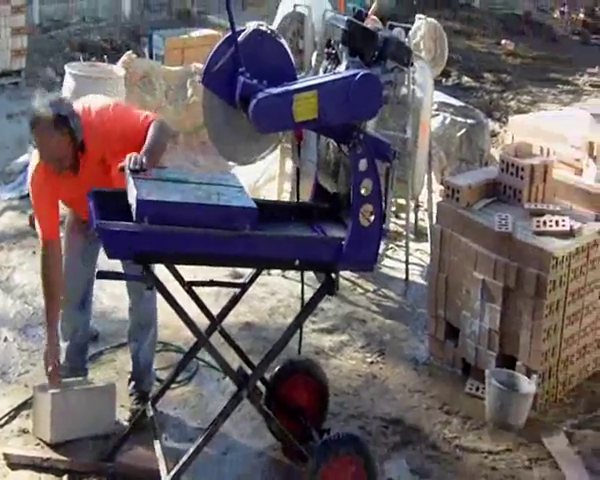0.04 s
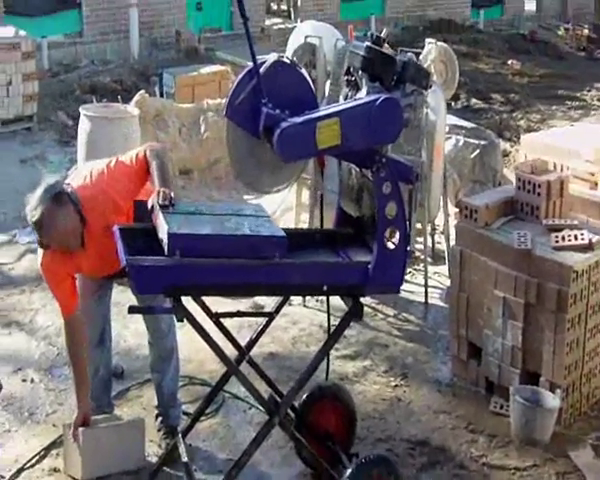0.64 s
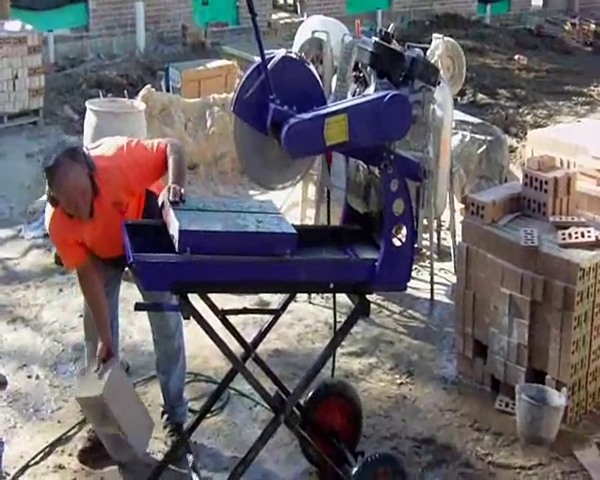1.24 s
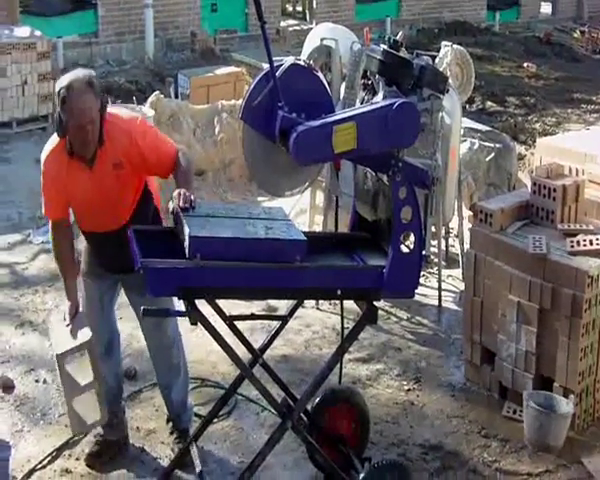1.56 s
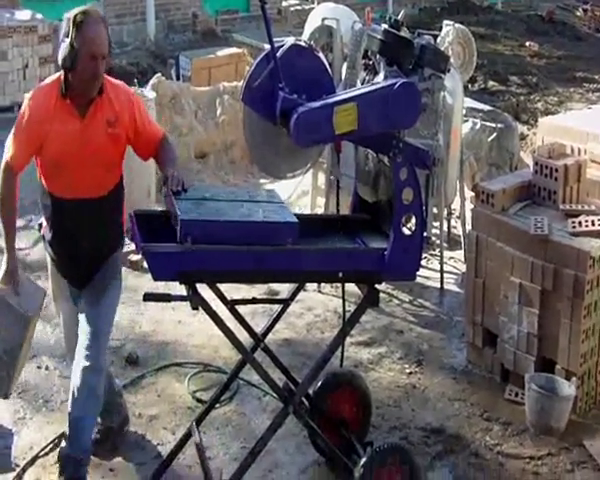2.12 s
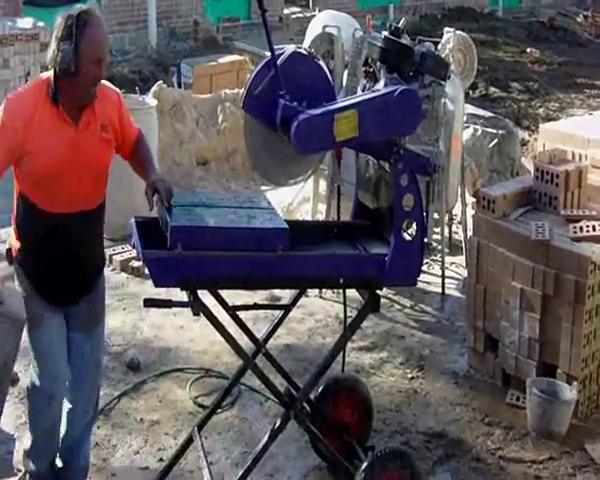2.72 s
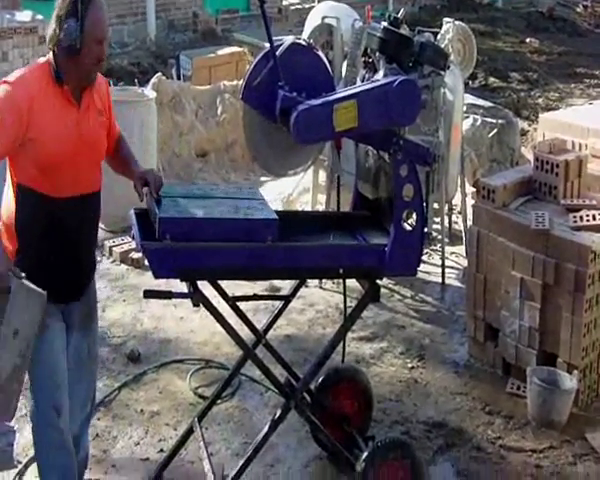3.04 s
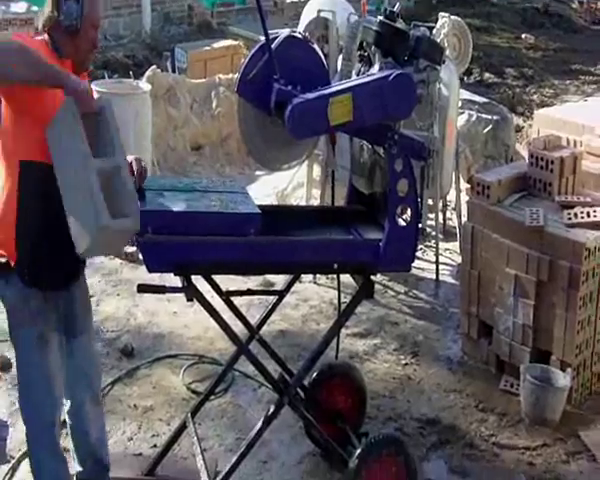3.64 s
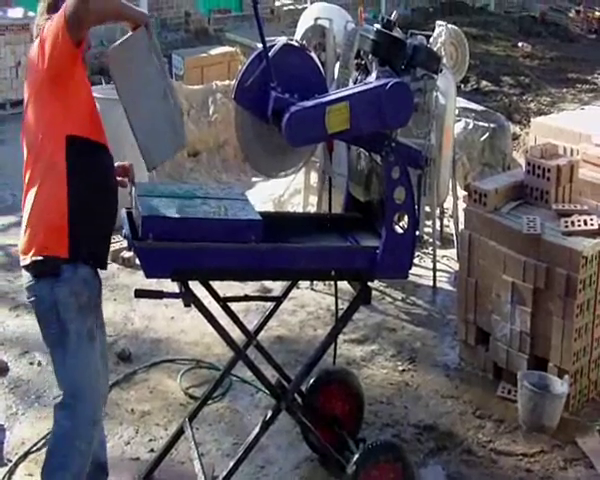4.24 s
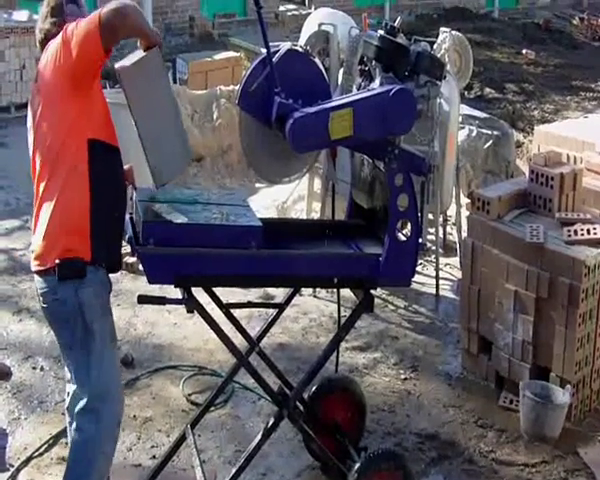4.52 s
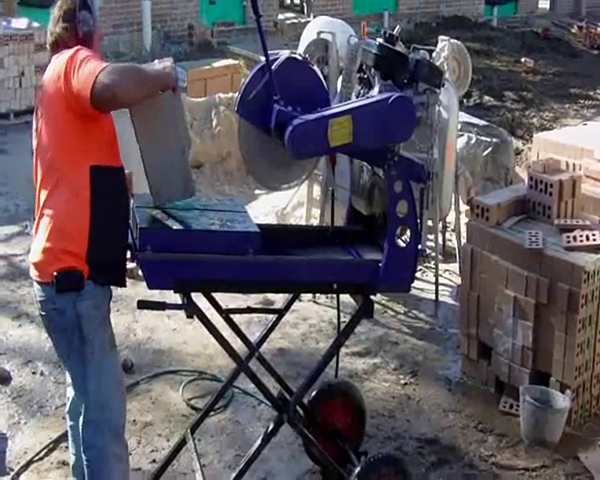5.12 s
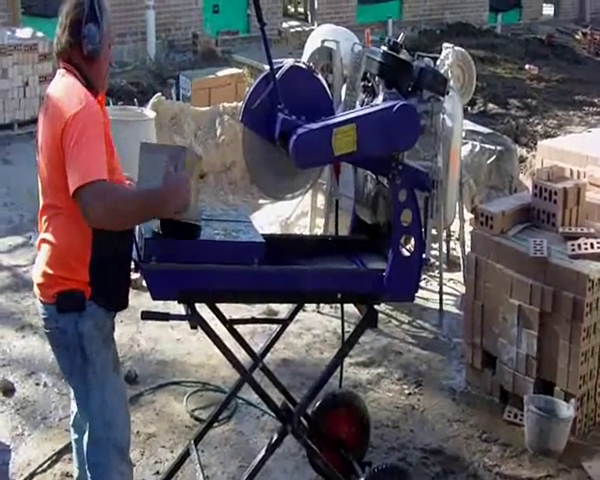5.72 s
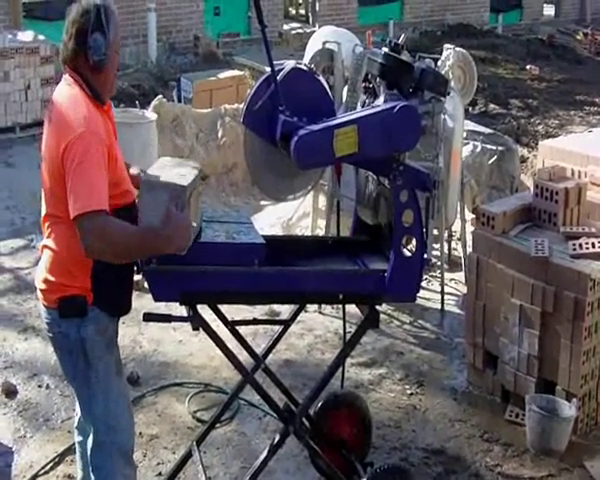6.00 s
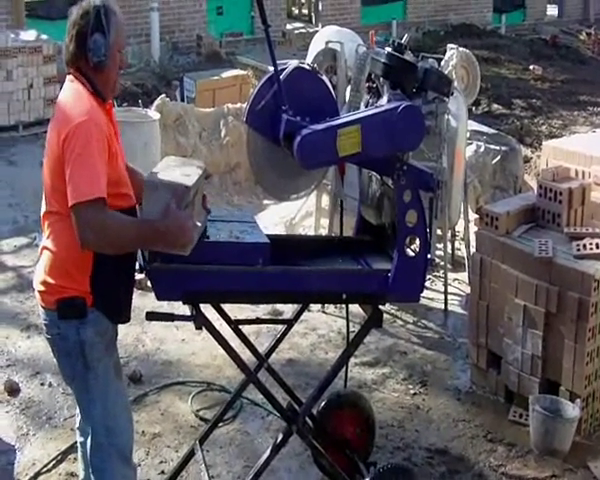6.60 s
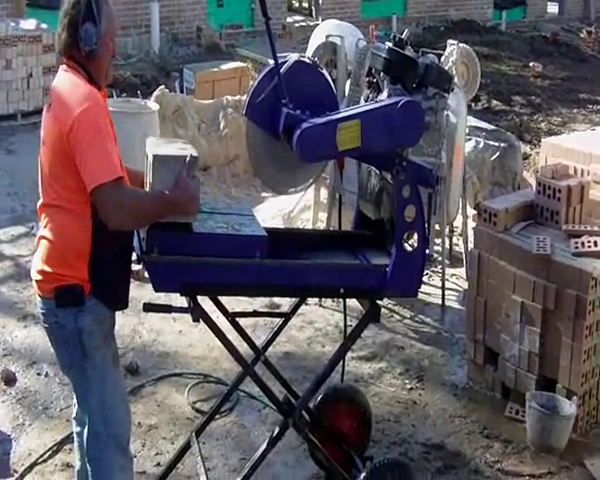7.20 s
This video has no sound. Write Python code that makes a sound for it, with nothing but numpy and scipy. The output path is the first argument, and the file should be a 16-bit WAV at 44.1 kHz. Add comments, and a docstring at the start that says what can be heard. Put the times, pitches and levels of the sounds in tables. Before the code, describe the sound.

After a few short squeaks, the free-spinning blade of a block saw builds to a piercing, constant whistle. Its petrol engine clatters at one speed throughout, with rushing air off the blade and faint wind on the microphone. Past the middle come two light double knocks of concrete on a metal tray. The saw keeps running in the open air, sounding slightly squashed and distorted.

```python
"""A petrol block saw runs on an open building site, its diamond blade spinning free over the beat and
clatter of a four-stroke engine and a faint breeze. At first the steel disc squeals briefly; within a
second, air rushing over its segments sets it whistling steadily on one mode. Near 5 s a concrete block
is set on the tray, then tipped flat. Throughout, a small overloaded recorder ducks and clips, and its
uneven sample clock adds a hum and thin high tones."""
import sys
import numpy as np
from scipy import signal
from scipy.fft import rfft, irfft, next_fast_len
from scipy.io import wavfile
from scipy.ndimage import map_coordinates

SR = 44100
rng = np.random.default_rng(int(sys.argv[2]) if len(sys.argv) > 2 else 0)


def generate_wav(sig):
    """Save sig (samples, or channels by samples) to the path in sys.argv[1] as 16-bit PCM at SR."""
    pcm = np.round(np.clip(np.atleast_2d(sig).T, -1, 1) * 32767).astype(np.int16)
    wavfile.write(sys.argv[1], SR, pcm)


N = 324576
TIME = np.arange(N) / SR

# Levels are relative within each table.
# brief squeals of the disc: start t/s, end t/s, f/Hz, level/dB
SQUEALS = [(-.03, 0.022, 3138, -4), (0.001, 0.082, 3140, -8.5), (0.085, 0.117, 3190, -6.5),
           (0.169, 0.19, 3668, -11), (0.175, 0.29, 3350, -14)]
# envelope of the disc's main mode: t/s, level/dB
WHISTLE_ENVELOPE = [(0.0, 14.5), (1.66, 12.5), (1.88, 10), (2.05, 12), (2.35, 12.5), (2.58, 7.6),
                    (3.25, 8.5), (3.48, 3.5), (3.76, 7.5), (4.2, 5), (4.87, 8.5), (5.48, 7), (5.61, 10),
                    (5.95, 6.8), (6.45, 5), (6.77, 2.5), (7.05, 9.5), (7.36, 5.5)]
# spectral density of the air rushing off the rim: f/Hz, level/dB
RIM_AIR_SPECTRUM = [(1900, -27.5), (2400, -13.5), (2800, -12), (3050, -7), (3370, -6.5), (3480, -5.5),
                    (3650, -3.5), (3820, -1), (3950, -1.5), (4120, -8), (4500, -11), (4900, -13),
                    (5700, -22), (9000, -36.5)]
# disc modes that the air stirs without locking on: f/Hz, bandwidth/Hz, level/dB
DISC_MODES = [(3040, 12, -29), (3085, 30, -29), (3300, 30, -32), (3437, 12, -24), (3478, 16, -21.5),
              (3550, 18, -25), (3633, 5, -23), (3788, 18, -18.5), (3840, 20, -20), (3878, 20, -19.5),
              (3925, 26, -20)]
# envelope of the whole engine: t/s, level/dB
ENGINE_ENVELOPE = [(0, 1.1), (1.2, 2.9), (2.3, 1.5), (2.7, 0.5), (4.2, 0.5), (7.36, 0.8)]
# strongest harmonics of the firing rate: harmonic number, level/dB
ENGINE_HARMONICS = [(5, -48.0), (8, -45.0), (9, -49.0), (10, -52.0), (11, -44.0), (13, -46.0), (14, -51.0),
                    (15, -46.0), (17, -41.0), (20, -43.0), (22, -37.0), (23, -48.0), (25, -40.0),
                    (26, -35.0), (28, -44.0), (32, -45.0), (33, -43.0), (36, -42.0), (38, -43.0),
                    (42, -42.0), (44, -47.0), (46, -46.0), (49, -46.0), (52, -45.0)]
# envelope of one harmonic that swells and fades: t/s, level/dB
SWELLING_ENVELOPE = [(0, -50), (2, -34), (4.8, -35), (5.1, -31), (6.35, -28.5), (6.55, -36), (7.36, -30)]
# spectral density of the engine's clatter: f/Hz, level/dB
CLATTER_SPECTRUM = [(20, -18), (120, -19), (280, -13), (400, -1), (560, -2), (760, 1.5), (1100, 1.5),
                    (1450, 1.5), (2000, -1), (3000, -1.5), (6000, -24.5), (7000, -8.5), (10000, -47),
                    (15000, -45)]
# narrow low tones of the spinning blade (first two rows), and ringing of the covers and frame:
# f/Hz, bandwidth/Hz, level/dB
BLADE_AND_PANEL_BANDS = [(371.2, 7.3, -36.5), (397, 4.4, -41.5), (663, 20, -35.5), (697, 13.5, -30.5),
                         (840, 12, -37), (907, 51, -30), (1082, 140, -32), (1270, 20, -57), (1636, 61, -33)]
# envelope of the breeze: t/s, level/dB
BREEZE_ENVELOPE = [(0, -60), (1, -52), (2.2, -45), (4.2, -42), (6, -49), (7.36, -45)]
# spectral density of the breeze: f/Hz, level/dB
BREEZE_SPECTRUM = [(15, 8), (40, 13), (110, -5), (250, -17), (800, -31)]
# impacts of the block on the tray: t/s, level/dB
BLOCK_IMPACTS = [(4.808, -18), (4.826, -22), (5.385, -29), (5.42, -24)]
# modes of the steel tray: f/Hz, bandwidth/Hz, level/dB
TRAY_MODES = [(560, 50, -11), (694, 31, -3), (810, 40, 8), (915, 50, -13), (1170, 57, -1), (1950, 120, -7)]


def from_db(db):
    """Amplitude ratio of a level in decibels."""
    return 10 ** (np.asarray(db) / 20)


def unit_rms(x):
    """Normalisation to unit mean power."""
    return x / np.sqrt(np.mean(x ** 2) + 1e-20)


def level_curve(envelope):
    """Linear interpolation of an envelope: its level in dB at every sample."""
    return np.interp(TIME, *np.transpose(envelope))


def phase_of(hz):
    """Phase in radians, the time integral of angular frequency."""
    return 2 * np.pi * np.cumsum(hz) / SR


def drift(hz):
    """Slow random fluctuation: noise of unit rms, low-passed at hz."""
    step, run_in = 40, 2000
    pole = np.exp(-2 * np.pi * hz * step / SR)
    noise = rng.standard_normal(N // step + run_in + 2)
    slow = signal.lfilter([1], [1, -2 * pole, pole * pole], noise)[run_in:]
    return np.interp(np.arange(N) / step, np.arange(len(slow)), unit_rms(slow))


def coloured(x, spectrum):
    """Spectral shaping by a smooth curve, to unit rms."""
    hz, db = np.transpose(spectrum)
    size = next_fast_len(N)
    bin_hz = np.maximum(np.arange(size // 2 + 1) * SR / size, 1)
    gain = from_db(np.interp(np.log(bin_hz), np.log(hz), db))
    return unit_rms(irfft(rfft(x, size) * gain, size)[:N])


def resonance(force, hz, bandwidth):
    """Forced response of a damped oscillator, at unit rms."""
    r = np.exp(-np.pi * bandwidth / SR)
    feedback = [1, -2 * r * np.cos(2 * np.pi * hz / SR), r * r]
    return unit_rms(signal.lfilter([1, 0, -1], feedback, force))


def speed_shortfall(build_up_s=0.72):
    """Starting transient: 1 at first, easing to 0 as the blade reaches speed."""
    return np.maximum(1 - TIME / build_up_s, 0) ** 1.6


def disc_squeals(rise_hz_per_s=200):
    """Transient oscillation: the disc sings in bursts, each gliding up as the blade gathers speed."""
    out = np.zeros(N)
    for start, end, hz, db in SQUEALS:
        progress = np.clip((TIME - start) / (end - start), 0, 1)
        swell = np.sqrt(np.abs(np.sin(np.pi * progress))) * from_db(db + 2.4 * drift(47))
        out += swell * np.sin(phase_of(hz + rise_hz_per_s * (TIME - start)))
    return np.sqrt(2) * out


def disc_whistle(mode_hz=3685, flat_hz=85, settle_s=0.12, level_db=-12, build_up_db=24):
    """Flow-excited oscillation: one sharp disc mode builds up, modulated a little by turbulence."""
    flutter_db = 1.08 * drift(16)
    db = level_db + level_curve(WHISTLE_ENVELOPE) - build_up_db * speed_shortfall() + flutter_db
    wander_hz = 1.39 * drift(7.6)
    hz = mode_hz - flat_hz * np.exp(-TIME / settle_s) + wander_hz
    return np.sqrt(2) * from_db(db) * np.sin(phase_of(hz))


def rim_air(hiss_db=-11, ringing_db=-5.5, gust_db=0.5, build_up_db=1):
    """Vortex shedding: eddies off the segments hiss around the whistle's pitch and ring the disc."""
    hiss = from_db(hiss_db) * coloured(rng.standard_normal(N), RIM_AIR_SPECTRUM)
    ringing = sum(from_db(db) * resonance(rng.standard_normal(N), hz, bandwidth)
                  for hz, bandwidth, db in DISC_MODES)
    gain = from_db(gust_db * drift(5.5) - build_up_db * speed_shortfall())
    return gain * (hiss + from_db(ringing_db) * ringing)


def engine_tones(firing_phase, level_db=1, waver_db=2, wander_rad=0.29, swelling_harmonic=40):
    """Harmonic series: periodic firing gives tones at multiples of its rate, each wavering alone."""
    harmonics = list(ENGINE_HARMONICS) + [(swelling_harmonic, level_curve(SWELLING_ENVELOPE))]
    out = np.zeros(N)
    for number, db in harmonics:
        phase = number * firing_phase + rng.uniform(0, 2 * np.pi) + wander_rad * drift(7.7)
        out += from_db(db + waver_db * drift(4.2)) * np.sin(phase)
    return np.sqrt(2) * from_db(level_db) * out


def clatter(firing_phase, broadband_db=-20, bands_db=1, knock_db=2.5, stroke_db=1.7):
    """Forced vibration: valve gear and piston knock six times a cycle, shaking covers and frame.
    The spinning blade adds two narrow low tones."""
    knocks = np.cos(6 * firing_phase) + np.cos(12 * firing_phase)
    shaking = from_db(knock_db * knocks + stroke_db * np.cos(2 * firing_phase))
    broadband = coloured(shaking * rng.standard_normal(N), CLATTER_SPECTRUM)
    excitation = shaking * rng.standard_normal(N)
    bands = sum(from_db(db) * resonance(excitation, hz, bandwidth)
                for hz, bandwidth, db in BLADE_AND_PANEL_BANDS)
    return from_db(broadband_db) * broadband + from_db(bands_db) * bands


def engine(firing_hz=32.28, hunting_hz=0.03):
    """Periodic excitation: tones and clatter share one governed firing rate, which hunts slightly."""
    firing_phase = phase_of(firing_hz + hunting_hz * drift(0.5))
    gain = from_db(level_curve(ENGINE_ENVELOPE))
    return gain * (engine_tones(firing_phase) + clatter(firing_phase))


def breeze():
    """Pressure fluctuation: air moving past the microphone makes a faint rumble."""
    return from_db(level_curve(BREEZE_ENVELOPE)) * coloured(rng.standard_normal(N), BREEZE_SPECTRUM)


def block_knocks(level_db=3.5):
    """Damped free vibration: each impact of the block starts the tray's modes, which then decay."""
    out = np.zeros(N)
    age = np.arange(SR // 5) / SR
    for onset_s, impact_db in BLOCK_IMPACTS:
        start = int(onset_s * SR)
        for hz, bandwidth, mode_db in TRAY_MODES:
            amplitude = from_db(impact_db + mode_db + rng.normal())
            decay = np.exp(-np.pi * bandwidth * age)
            out[start:start + len(age)] += amplitude * decay * np.sin(2 * np.pi * hz * age)
    return from_db(level_db) * out


def scene():
    """Superposition in the open air: saw, breeze and block add in one channel."""
    saw = disc_squeals() + disc_whistle() + rim_air() + engine()
    return (saw + breeze() + block_knocks())[None]


def gain_control(x, threshold_db=-3, slope=0.66, response_s=0.0048):
    """Compression: the gain sinks as the running power rises over a threshold."""
    pole = np.exp(-1 / (response_s * SR))
    power = signal.lfilter([1 - pole], [1, -pole], x ** 2)
    excess_db = np.maximum(10 * np.log10(power + 1e-9) - threshold_db, 0)
    return x * from_db(-slope * excess_db)


def overload(x, drive_db=-1.5, limit=0.95, hardness=7.4):
    """Saturation: peaks are flattened against the converter's limit."""
    x = x * from_db(drive_db)
    return x / (1 + np.abs(x / limit) ** hardness) ** (1 / hardness)


def uneven_clock(x, skip_hz=3899.6, buffer_hz=47.3, slip=0.21, depth_samples=0.91):
    """Phase modulation: skipped samples give the whistle sidebands, heard as a hum and high tones."""
    skips = skip_hz * TIME - slip * np.floor(buffer_hz * TIME)  # each buffer slips by part of a skip
    timing_error = depth_samples * (skips % 1 - 0.5)
    return map_coordinates(x, [np.arange(N) - timing_error], order=3, mode="nearest")


def record(dry, cutoff_hz=15750):
    """Distortion in cascade: compression, saturation and clock error, then a low-pass filter."""
    distorted = uneven_clock(overload(gain_control(dry[0])))
    low_pass = signal.firwin(1001, cutoff_hz, fs=SR)
    return signal.fftconvolve(distorted, low_pass, "same")[None]


dry = scene()
out = record(dry)
generate_wav(out)
```